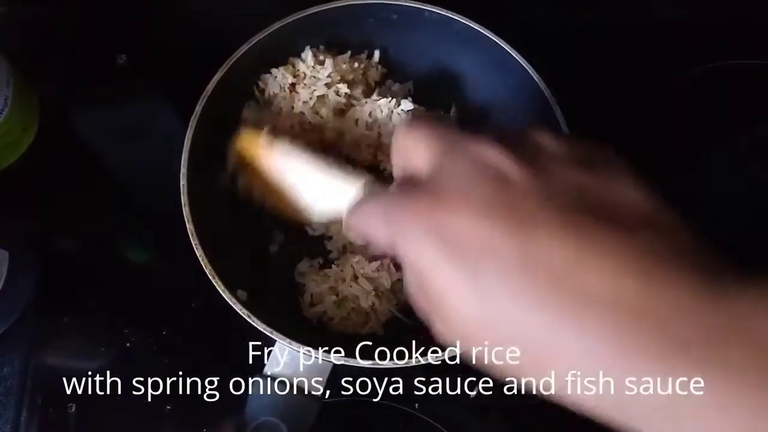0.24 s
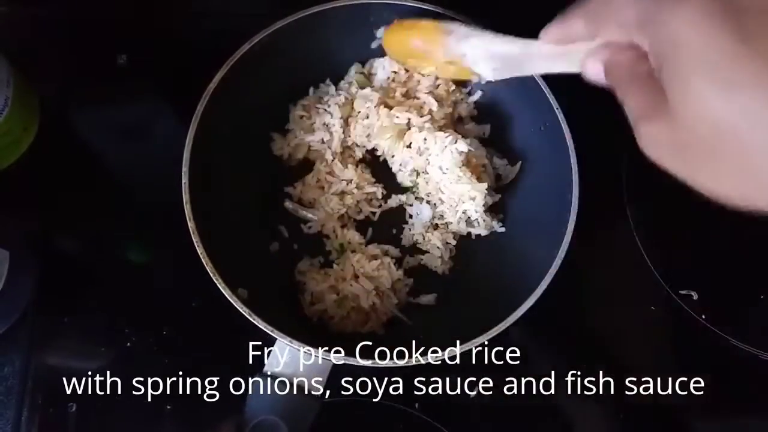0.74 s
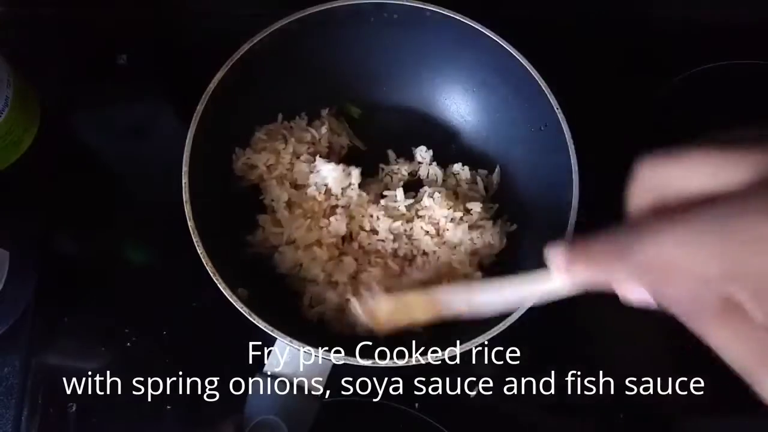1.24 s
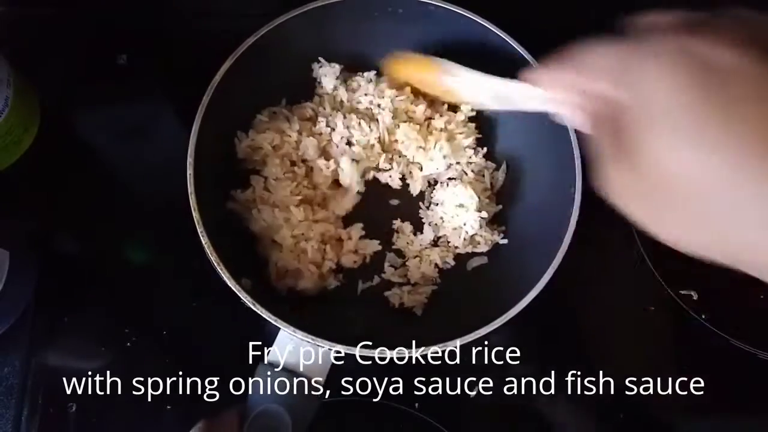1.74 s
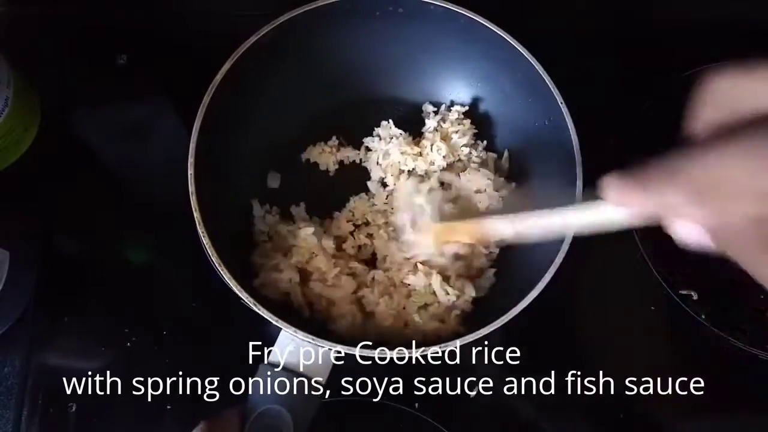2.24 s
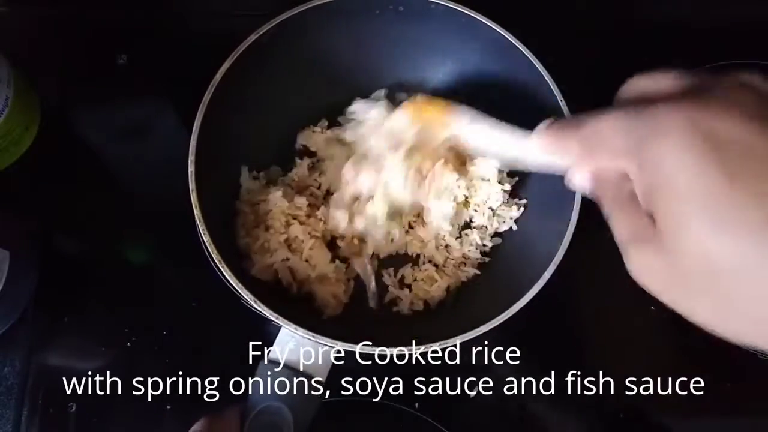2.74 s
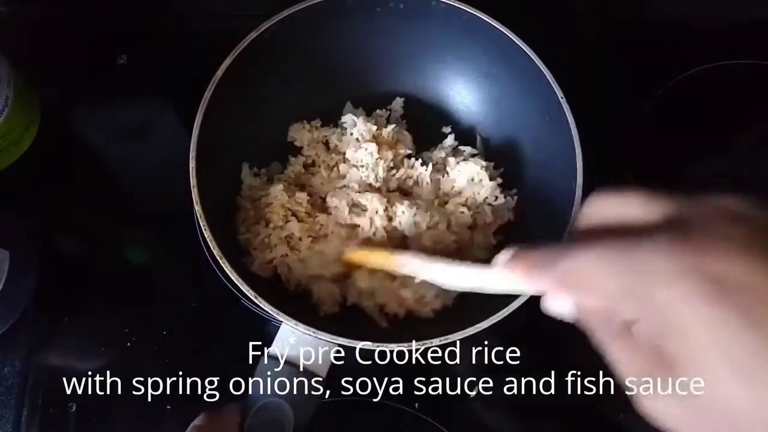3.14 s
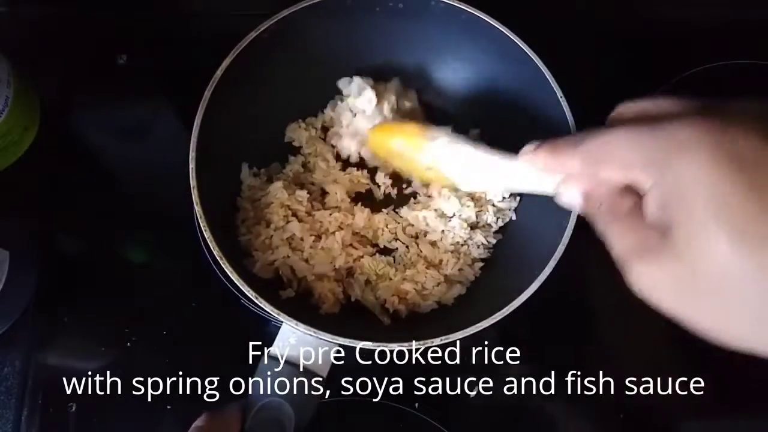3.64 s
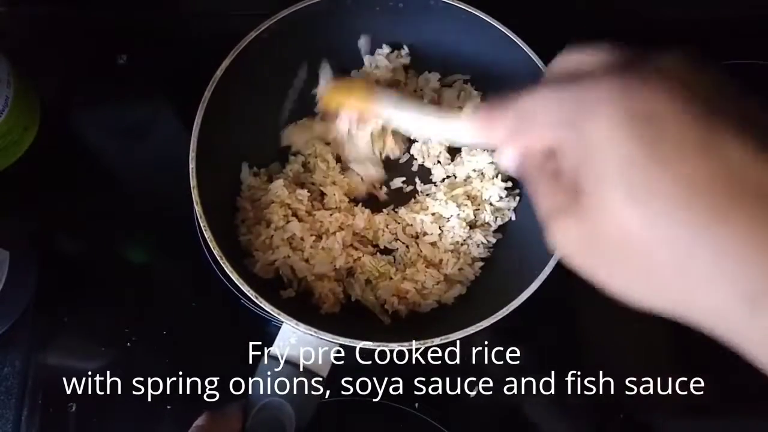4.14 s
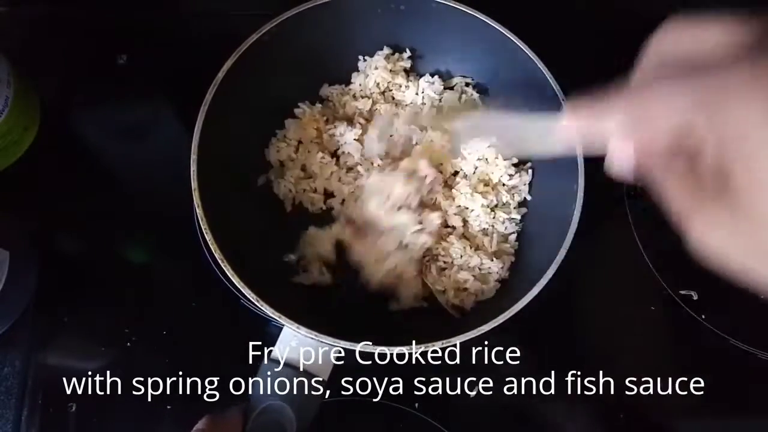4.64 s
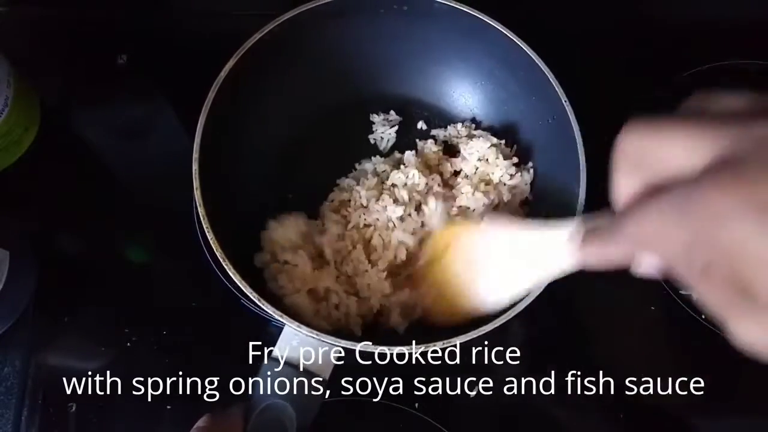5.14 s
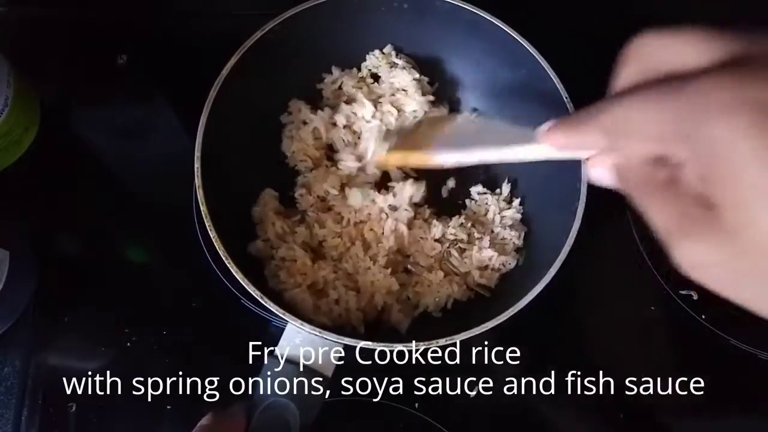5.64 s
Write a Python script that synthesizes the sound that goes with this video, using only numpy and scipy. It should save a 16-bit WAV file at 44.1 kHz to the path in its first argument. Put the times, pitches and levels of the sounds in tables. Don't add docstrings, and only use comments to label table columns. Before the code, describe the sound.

Rice fries in a thin metal pan on a kitchen hob, heard close up with a short room echo. A quiet, fine hiss with tiny crackles runs throughout, over a very faint fan hum, swelling briefly around 1.7 and 2.0 seconds. Oil spits bright little cracks, densest in the first half second, then scattered. A wooden spatula knocks the pan at 0.4 with a dull ring and a brief faint squeak. After light taps near 1.1, a hard, bright clack at 1.55 rattles on. A softer knock comes at 2.0, then a quick bouncing chatter at 2.6. Lighter taps follow at 2.9 and 3.4, a firmer one at 3.9 and a weaker one at 4.05. Knocks return at 5.0 and 5.4, then the loudest ringing clatter at 5.6 to 5.75. Strokes push low, soft thumps through the hob top; sizzling continues to the end at about six seconds.

```python
import sys
import numpy as np
from scipy import signal
from scipy.fft import rfft, irfft, next_fast_len
from scipy.io import wavfile
from scipy.ndimage import uniform_filter1d

SR = 44100
rng = np.random.default_rng(int(sys.argv[2]) if len(sys.argv) > 2 else 0)


def convert_level_to_amplitude(level_db):
    exponent = np.asarray(level_db, float) / 20
    return 10 ** exponent


def unload_audio(sound):
    columns = np.transpose(np.atleast_2d(sound))
    steps = np.round(np.clip(columns, -1, 1) * 32767)
    wavfile.write(sys.argv[1], SR, steps.astype(np.int16))


N = 260631
STEADY_TOP_HZ = 15830


def unit(x):
    return x / np.sqrt(np.mean(x ** 2) + 1e-20)


def along(points, hz):
    f, v = np.transpose(points)
    return np.interp(np.log(hz + 1), np.log(f + 1), v)


def curves(rows):
    s, *cols = np.transpose(rows)
    return [np.interp(np.arange(N) / SR, s, c) for c in cols]


def arches(rows):
    t = np.arange(0, N, 64) / SR
    rise_db = sum(db * np.sin(np.pi * np.clip((t - s) / length, 0, 1)) for s, length, db in rows)
    return np.interp(np.arange(N) / SR, t, rise_db)


def filtered(x, response):
    m = next_fast_len(len(x) + SR // 8)
    return irfft(rfft(x, m) * response(np.fft.rfftfreq(m, 1 / SR)), m)[:len(x)]


def band(x, lo_hz, hi_hz):
    sos = signal.butter(2, [lo_hz, min(hi_hz, SR / 2 - 100)], "band", fs=SR, output="sos")
    return signal.sosfilt(sos, x)


def modes(table, lag=np.pi):
    def response(f):
        total = 0
        for k, (hz, width, db) in enumerate(table):
            start = 1j * f * np.cos(k * lag) + hz * np.sin(k * lag)
            total = total + convert_level_to_amplitude(db) * width * start / (hz * hz - f * f + 1j * f * width)
        return total
    return response


def patchy(depth_db):
    z = signal.stft(rng.standard_normal(N), nperseg=512)[2]
    field = uniform_filter1d(rng.standard_normal(z.shape), 6, 0)
    field = uniform_filter1d(field, 10, 1)
    return signal.istft(z * convert_level_to_amplitude(depth_db * unit(field - field.mean())), nperseg=512)[1][:N]


def bursts(times, db, t60, tail_db, lumpy_db, bodies=None):
    out, t = np.zeros(N + SR), np.arange(SR // 4) / SR
    grain = 90
    for k, (s, level, life) in enumerate(zip(times, db, t60)):
        luck = rng.standard_normal(len(t) // grain + 1)
        lumps = 0.78 * luck + 1.33 * uniform_filter1d(luck, size=5)
        lumps = np.repeat(lumps, grain)[:len(t)]
        fade_db = -60 * t / max(life, .005)
        push = convert_level_to_amplitude(tail_db + lumpy_db * lumps + fade_db) * rng.standard_normal(len(t))
        push[0] += 1
        sound = filtered(push, bodies[k]) if bodies else push
        out[round(s * SR):][:len(t)] += convert_level_to_amplitude(level) * sound
    return out[:N]


def sizzle():
    # time in seconds, frying strength in dB
    strength = [(0.0, -78.5), (0.3, -74), (0.37, -86), (0.47, -77), (0.85, -69.5), (1.17, -72),
                (1.29, -78.5), (1.55, -75), (1.71, -62), (1.86, -76), (2.55, -78), (3.01, -73.5),
                (3.45, -75.5), (3.81, -76.5), (4.36, -81), (4.8, -73), (5.15, -73), (5.6, -79)]
    # frequency in Hz, level in dB per Hz
    hiss_colour = [(880, -15), (1500, -6.5), (1960, -17.5), (2140, -16.5), (2560, -6.5), (2770, -12),
                   (3590, -8), (5120, -6.5), (7170, -1), (8000, -6.5), (11800, -14), (15100, -13),
                   (16000, -20)]
    # start in seconds, length in seconds, rise in dB
    swells = [
        (1.964, 0.23, 7),
        (1.096, 0.089, 6),
        (4.99, 0.2, 4.5),
        (3.537, 0.32, 5),
        (4.72, 0.15, 3),
        (0.38, 0.18, 6.5),
    ]
    fry_db, = curves(strength)
    top_db = fry_db.mean() - 1.0 + 0.71 * (fry_db - fry_db.mean())
    crackle_db = 3.5 * np.minimum(rng.exponential(size=N), 2.5)
    crackle = (rng.random(N) < 1200 / SR) * rng.standard_normal(N) * convert_level_to_amplitude(crackle_db)
    hiss = patchy(2.6) + 0.57 * unit(crackle)
    clumps = rng.standard_normal(N // 100)
    flutter_db = 1.4 * np.interp(np.arange(N) / SR * 250, np.arange(N // 100), clumps)
    top = lambda hz: 1 / (1 + (9500 / (hz + 1)) ** 8)
    colour = lambda hz: convert_level_to_amplitude(along(hiss_colour, hz)) * (hz < STEADY_TOP_HZ)
    body = filtered(hiss, lambda hz: colour(hz) * np.sqrt(1 - top(hz)))
    air = filtered(hiss, lambda hz: colour(hz) * np.sqrt(top(hz)))
    mix = convert_level_to_amplitude(fry_db - 0.5) * unit(body) + convert_level_to_amplitude(top_db) * unit(air)
    return convert_level_to_amplitude(arches(swells) + flutter_db) * mix


def fan():
    # frequency in Hz, level in dB per Hz
    air_colour = [(12, -34), (20, -47), (27, -38), (48, -8.5), (102, -5), (168, -16), (247, -14.5),
                  (290, -10.5), (310, -21.5), (389, -17.5), (523, -26), (627, -14.5), (1380, -28.5),
                  (2500, -37.5), (4500, -36), (5850, -53.5), (9900, -120)]
    # start in seconds, length in seconds, rise in dB
    slides = [
        (1.45, 0.4, 8.5),
        (2.55, 0.92, 5.5),
        (3.7, 0.53, 2.5),
        (5.0, 0.93, 0.5),
    ]
    air = convert_level_to_amplitude(-68.5) * unit(filtered(patchy(2.0), lambda hz: convert_level_to_amplitude(along(air_colour, hz))))
    bass = filtered(air, lambda hz: 1 / (1 + (hz / 170) ** 6))
    whine = convert_level_to_amplitude(-80) * unit(filtered(rng.standard_normal(N), modes([(646.8, 12, 0)])))
    return bass + whine + convert_level_to_amplitude(arches(slides) - 0.4) * (air - bass)


def hob():
    # time in seconds, peak in dB, length in seconds, pitch in Hz
    pushes = [(0.195, -73, 0.069, 95.15), (0.422, -50, 0.036, 98.5), (0.795, -55, 0.1, 108.1),
              (0.936, -59.5, 0.025, 107.9), (1.037, -54.5, .035, 109.3), (1.152, -55, 0.038, 108.8),
              (1.349, -64, 0.027, 121.6), (1.45, -72, 0.029, 120), (1.566, -46, 0.033, 113.6),
              (1.636, -46, 0.046, 96.7), (2.024, -51, 0.041, 106.6), (2.162, -66, 0.047, 110.6),
              (2.32, -66, 0.032, 107.9), (2.638, -47, 0.043, 98.6), (2.7, -47.5, .03, 105),
              (3.002, -53, 0.049, 106), (3.18, -65.5, .1, 101.8), (3.408, -54, 0.098, 101.8),
              (3.506, -55.5, 0.067, 100.5), (3.723, -52.5, 0.066, 99.9), (3.906, -47.5, 0.043, 97.8),
              (4.063, -50, 0.048, 97.2), (4.775, -68, 0.018, 101), (5.013, -54, .035, 105),
              (5.117, -50, 0.032, 108.2), (5.406, -55, 0.051, 105.5), (5.685, -44, 0.07, 93.5)]
    # frequency in Hz, width in Hz, level in dB
    top_modes = [(93.6, 29, 0), (117.5, 35, -1)]
    t = np.arange(0, N, 64) / SR
    level = convert_level_to_amplitude(-71)
    for s, db, length, hz in pushes:
        level = level + convert_level_to_amplitude(db) * np.exp(-((t - s) / length * 1.58) ** 2)
    level = np.interp(np.arange(N) / SR, t, level)
    pitch_hz = curves(pushes)[-1]
    tone = np.sqrt(2) * np.sin(2 * np.pi * np.cumsum(pitch_hz) / SR)
    rough = unit(filtered(rng.standard_normal(N), lambda f: modes(top_modes)(f) ** 2))
    return convert_level_to_amplitude(-2.0) * level * (tone + 0.56 * rough)


def squeaks():
    # start in seconds, centre in Hz, width in Hz, level in dB, length in seconds
    rubs = [(1.295, 3730, 200, -77.5, 0.073), (3.4, 1500, 89, -70, 0.025), (0.396, 4620, 200, -66, .03),
            (0.399, 8500, 250, -57, 0.017), (0.398, 10800, 300, -62, 0.023), (0.402, 7100, 500, -63, 0.028),
            (0.445, 8000, 260, -66, 0.027), (0.482, 8600, 250, -64, .028), (0.13, 4800, 800, -75, 0.17),
            (0.024, 5400, 1500, -72, 0.064), (0.42, 3250, 170, -74, 0.032)]
    out = np.zeros(N)
    for s, hz, width_hz, db, length in rubs:
        span = slice(max(round(s * SR) - 2000, 0), round(s * SR) + SR // 4)
        u = (np.arange(N)[span] / SR - s) / length
        rub = unit(band(rng.standard_normal(N)[span], hz - width_hz / 2, hz + width_hz / 2))
        out[span] += convert_level_to_amplitude(db) * np.sin(np.pi * np.clip(u, 0, 1)) * rub
    return out


def spits():
    # time in seconds, peak in dB, top band relative to it in dB, t60 in seconds
    drops = [(0.0463, -58, -14, 0.14), (0.064, -59, -13, 0.05), (0.168, -71, -14, 0.037),
             (0.2433, -64, -19, 0.09), (0.279, -41, -5.5, 0.046), (0.3214, -57.5, -1, 0.028),
             (0.398, -52, -8, 0.33), (0.413, -52.5, -12, 0.33), (0.4426, -41.5, -10, 0.042),
             (0.489, -60, -10, 0.14), (0.6277, -57, -25, 0.046), (0.8247, -61, -14, 0.075),
             (0.8504, -58, -14, 0.039), (1.03, -51.5, -16, 0.084), (1.075, -55.5, -5, 0.052),
             (1.1275, -60, -6, 0.069), (1.1466, -64, -13, 0.049), (1.3147, -59, -11, 0.068),
             (1.6413, -46.5, -4, 0.12), (1.827, -57, -18, 0.088), (2.005, -55.5, -18, 0.2),
             (2.033, -54, -28, 0.072), (2.0583, -50.5, -17, 0.074), (2.144, -52, 1, 0.034),
             (2.257, -55, -15, 0.093), (2.279, -50.5, -15, 0.12), (2.842, -48, -9, 0.044),
             (3.371, -57.5, -10, 0.16), (3.7218, -56, -13, 0.17), (3.8352, -60, 3, 0.025),
             (4.042, -49, -1, 0.053), (4.4355, -60, -20, 0.13), (5.1322, -54, -14, 0.061),
             (5.242, -43, -5, 0.034), (5.8577, -44.5, -6, 0.058)]
    # time in seconds, peak in dB
    faint_ticks = [(0.6664, -62), (0.9707, -55.5), (1.2465, -62), (1.3513, -61), (2.9078, -57),
                   (3.253, -59), (3.6324, -64), (3.8818, -53), (4.3571, -60), (4.5043, -64), (4.571, -64),
                   (4.77, -59), (4.87, -71), (5.395, -48.5), (5.68, -54), (5.745, -47)]
    s, db, top, t60 = np.transpose(drops + [row + (-5, 0.044) for row in faint_ticks])
    scatter_hz = 350 * rng.standard_normal(len(s))
    ring_hz = 7140 - 52 * (db - db.mean()) + scatter_hz
    fizz = np.zeros(N)
    for lo, hi, gain_db in [(2000, 11000, -17), (5230, 10300, -2.5), (9050, 17500, top - 2.4)]:
        fizz += band(bursts(s, db + gain_db, t60, -0.79, 2.4), lo, hi)
    rings = [modes([(hz, 300, 0)]) for hz in ring_hz]
    return fizz + bursts(s, db + 7.0, t60, -4.5, 1.7, rings)


def struck(body, tilts_db, soft_hz, scatter_db, lag):
    middle = np.median([hz for hz, width, db in body])

    def contact(tilt):
        moved = []
        for hz, width, db in body:
            shift = 0.012 * rng.normal() * hz / (hz + 2000)
            level = db + tilt * np.log2(hz / middle) + rng.normal(0, scatter_db)
            moved.append((hz * (1 + shift), width, level))
        ring = modes(moved, lag)
        return lambda f: ring(f) / (1 + 1j * f / soft_hz) ** 3
    return [contact(tilt) for tilt in tilts_db]


def pan():
    # time in seconds, base peak in dB, base tilt in dB/oct,
    # wall relative to base in dB, wall tilt in dB/oct
    knocks = [(0.389, -30.5, 1, -16, -26), (1.126, -51, -16, -17, -3), (1.5425, -24.5, -5.5, 3, 14),
              (1.988, -37.5, 1.5, 3.5, 4), (2.589, -29, 4, 9, 12), (2.925, -51, 14, 8, 3),
              (3.371, -41, -6, -16, 18), (3.715, -60, -14, -7, -1), (3.871, -30, -4, 3.5, 3),
              (4.044, -41, -5, -8.5, 7), (4.987, -36.5, 2, 7, -5.5), (5.076, -42, -15, -6, -7),
              (5.242, -65, 2, 6, 19), (5.38, -35, 0, 12, 1), (5.6245, -29, 4, 3, -6),
              (5.724, -30, -2, -14, -3)]
    # time in seconds, base peak in dB, base tilt in dB/oct, wall rel. in dB
    rebounds = [(0.4, -45, 5, -1.5), (1.143, -48, -7, -10), (1.551, -31.5, 8.5, -7), (1.59, -34.5, -10, 3),
                (1.623, -39, 1, -14), (1.66, -40.5, -16, -33), (2.092, -54, -10, -14),
                (2.595, -35, -5, 10.5), (2.601, -34.5, 9, 8.5), (2.609, -35, 4, 9), (2.616, -26.5, -6.5, 2),
                (2.632, -31, 3, 0), (2.974, -47, -8, -14), (5.094, -45.5, 10, 2.5), (5.12, -54, 4, 2),
                (5.63, -31, 3, -2), (5.639, -26.5, -3, -1), (5.646, -30.5, -3, 6), (5.667, -35, 8, 7),
                (5.692, -36, -5, 4), (5.42, -45, 9, 1), (5.445, -51, 11, 2), (5.734, -35, 6, -5)]
    # time in seconds, flank peak in dB, flank tilt in dB/oct,
    # rim relative to flank in dB, rim tilt in dB/oct
    clacks = [(0.3904, -68, -9, -2, -2), (1.5425, -23, 2, -4, 6), (1.5519, -28, -6.5, -8, 5),
              (1.574, -38, 1, -0.5, 12), (1.6, -34.5, -6, -4, 7), (1.989, -41.5, -5, -21.5, 1.5),
              (2.5898, -26, -2, -2.5, -15), (2.6, -31, -6, -6, 1), (2.6162, -31.5, 1, -4.5, 5),
              (2.6085, -38, 7, -5, 3), (2.622, -40, 0, -6, 0), (2.632, -38, 0, -4.5, 5),
              (2.641, -46, 0, -5, 0), (2.928, -56, -10, 1.5, 8), (3.8707, -55, -1, 1.5, 12),
              (4.0418, -58, 0, 5, -5), (4.9858, -35, 15, -9.5, 6), (5.083, -60.5, -8, 2, 1),
              (5.3811, -31.5, -7, -11, 14), (5.3948, -59, 15, 5.5, 23), (5.6241, -19.5, -3, -2.5, -2),
              (5.631, -29, -3, -5.5, -6), (5.6406, -27, 4, -11, -2), (5.6634, -41, 11, -1.5, -1.5),
              (5.7333, -39, 0.5, -3, -9)]
    # frequency in Hz, width in Hz, level in dB
    base_modes = [(159.3, 12, -1.5), (196.5, 8, -21), (258, 21.3, 7.5), (331, 76, -6.5), (399, 32, -1),
                  (443, 37, -3)]
    wall_modes = [(636, 33, -4.5), (720, 62, 3), (790, 29, 0), (850, 47, -3), (962, 72, -4),
                  (1117, 38.7, -7), (1262, 36, -12.5)]
    flank_modes = [(1500, 73, 0.5), (1960, 91, -2.5), (2236, 33, -2), (2760, 173, -1.5), (3167, 78, -5),
                   (3642, 47, -8), (2450, 890, -11.5)]
    rim_modes = [(4145, 90, -15.5), (4600, 100, -16), (5230, 120, -7.5), (5820, 48, -12), (5980, 49, -15),
                 (6390, 98, -6), (6820, 140, -5), (7600, 57, -4), (7700, 70, -3.5), (8170, 91, 2.5),
                 (8530, 80, 2.5), (9070, 59, 0), (7190, 3240, -4.5)]
    bounced = [row + (1.1,) for row in rebounds]
    s, db, base_tilt, wall, wall_tilt = np.transpose(knocks + bounced)
    t60 = [0.09] * len(knocks) + [0.1] * len(rebounds)
    base = struck(base_modes, base_tilt, soft_hz=658, scatter_db=1.0, lag=1.44)
    low = bursts(s, db + 39, t60, -31.0, 2.1, base)
    side = struck(wall_modes, wall_tilt, soft_hz=1620, scatter_db=1.5, lag=1.48)
    low += bursts(s, db + wall + 35.0, t60, -28.0, 1.9, side)
    s, db, flank_tilt, rim, rim_tilt = np.transpose(clacks)
    t60 = 0.19 + 0.0233 * rim
    flank = struck(flank_modes, flank_tilt, soft_hz=5500, scatter_db=1.5, lag=np.pi)
    high = bursts(s, db + 27.5, t60, -25.5, 3.6, flank)
    edge = struck(rim_modes, rim_tilt, soft_hz=8200, scatter_db=2.0, lag=np.pi)
    high += bursts(s, db + rim + 19.0, t60, -14, 3.3, edge)
    echo = lambda f: 1 - 0.37 * modes([(520, 150, 0)])(f)
    small = lambda f: (1j * f / (120 + 1j * f)) ** 2
    return filtered(low + high, lambda f: echo(f) * small(f))


def notes():
    # time in seconds, pitch in Hz, peak in dB, t60 in
    # seconds
    bare_notes = [(.389, 342, -32.5, 0.075), (1.543, 2760, -43, 0.042), (1.598, 2000, -34.5, 0.048),
                  (1.65, 198, -43, 0.21), (2.925, 366, -38, 0.047), (3.872, 1257, -29, 0.024),
                  (3.872, 402, -35, 0.1), (4.987, 3470, -44.5, 0.028), (4.987, 290.5, -28.5, 0.072),
                  (5.243, 1290, -59, 0.032), (5.381, 2000, -38.5, 0.054), (5.381, 2737, -45, 0.064),
                  (5.382, 5230, -50, 0.078), (5.381, 1557, -34.5, 0.039), (5.395, 7600, -51, 0.078),
                  (5.627, 720, -16.5, 0.08), (1.128, 258, -50, 0.1), (4.987, 1350, -41, 0.032),
                  (4.987, 2694, -52, 0.04), (5.243, 5500, -45, 0.015), (5.3824, 425, -25.5, 0.075),
                  (5.636, 258, -27.5, 0.12), (5.7335, 258, -23.5, 0.11), (5.7451, 258, -30, .09),
                  (5.641, 740, -22, .07), (5.66, 720, -33, .2), (1.5436, 252, -33.5, .1),
                  (2.592, 1012, -39, .15), (2.6, 1124, -42, .2), (1.544, 790, -38, 0.073),
                  (2.588, 1500, -36, 0.18), (2.842, 5456, -55, 0.025), (1.989, 258, -42.5, 0.14),
                  (5.648, 6390, -37, 0.097), (5.6245, 5230, -22, 0.035), (5.639, 5230, -32, 0.056),
                  (5.6245, 5820, -24.5, 0.04), (5.638, 2221, -35.5, 0.12), (1.5425, 8200, -33.5, 0.06),
                  (1.5425, 6710, -33, 0.046), (1.575, 1500, -39.5, 0.087), (2.614, 7800, -38, 0.04),
                  (2.634, 4600, -43, 0.04),
                  (1.112, 258, -56.5, .2), (1.14, 807, -61, .08), (2.927, 3526, -61.5, .06),
                 (2.94, 2223, -65, .15), (2.925, 790, -36.5, 0.043), (3.372, 258, -37, 0.097),
                 (3.873, 258, -41, 0.11), (3.873, 680, -37, .05), (3.7, 393, -53, .07),
                 (4.046, 703, -50, .04), (5.074, 230, -50, .06), (5.078, 377, -52, 0.22),
                 (5.083, 711, -47.5, 0.14), (5.01, 790, -48, 0.14), (5.382, 280, -28, 0.084),
                 (5.381, 2420, -44, 0.042), (2.59, 732, -32, .08), (2.598, 861, -35, .1),
                 (2.61, 258, -34, 0.077), (5.6285, 640, -27, .05), (5.73, 398, -35.5, 0.079),
                 (5.694, 6390, -46, .09), (5.672, 5230, -48, .06), (5.733, 5500, -44, .05),
                 (5.776, 6390, -54, 0.044), (1.5425, 2770, -36, 0.046), (1.5425, 1020, -37, 0.066),
                 (1.59, 790, -42, .08), (1.73, 8300, -56, .06), (.44, 2800, -64, .07),
                 (.44, 1310, -60, .04), (.39, 810, -48, 0.16), (1.989, 800, -46.5, 0.045),
                 (1.3, 290, -64, .2), (3.2, 255, -55, .15)]
    out, t = np.zeros(N + SR), np.arange(SR // 3) / SR
    for s, hz, db, t60 in bare_notes:
        blur = np.sqrt(2 * np.pi * 0.013 * hz / SR) * hz / (hz + 3000)
        drift = np.cumsum(rng.standard_normal(len(t))) * blur
        tone = np.sin(2 * np.pi * hz * t + drift) * (1 - np.exp(-t / 0.002))
        out[round(s * SR):][:len(t)] += convert_level_to_amplitude(db - 60 * t / t60) * tone
    return out[:N]


def kitchen(x):
    # frequency in Hz, t60 in seconds
    room_decay = [(100, 0.15), (700, 0.26), (4000, 0.34), (12000, 0.26)]
    out, hop = np.zeros(N + 2 * SR), SR // 4
    for start in range(0, N, hop):
        hz, t, z = signal.stft(rng.standard_normal(SR // 2), SR, nperseg=256)
        fade = convert_level_to_amplitude(-60 * t / along(room_decay, hz)[:, None])
        tail = signal.istft(z * fade, SR, nperseg=256)[1]
        wet = signal.fftconvolve(x[start:start + hop], tail / np.linalg.norm(tail))
        out[start + 200:][:len(wet)] += wet
    return out[:N]


def scene():
    wood, oil, bare = pan() + squeaks(), spits(), notes()
    dull_notes = filtered(bare, lambda hz: 0.67 / (1 + hz / 2500))
    room = convert_level_to_amplitude(-7.5) * kitchen(wood + oil + dull_notes)
    lasting = filtered(wood + bare + 0.64 * oil + room, lambda hz: hz < STEADY_TOP_HZ)
    return (lasting + 0.53 * oil + sizzle() + hob() + fan())[None]


def gappy_treble(x):
    # frequency in Hz, rarity in spreads
    gap_rarity = [(1500, 4), (2000, 1.7), (3100, 1.1), (4300, 1.3), (5200, 2.6), (12000, 3.2), (14500, 2.2)]
    hz, t, z = signal.stft(x, SR, nperseg=2048, noverlap=1536)
    level = uniform_filter1d(np.abs(z) ** 2, size=9, axis=0)
    luck = uniform_filter1d(rng.standard_normal((len(hz) // 9 + 1, len(t))), size=7, axis=1)
    empty = np.repeat(unit(luck), 9, axis=0)[:len(hz)] > along(gap_rarity, hz)[:, None]
    quiet = level < 5 * np.median(level, axis=1)[:, None]
    total = level.sum(axis=0)
    loud = (total > convert_level_to_amplitude(44) * np.median(total)) & (hz[:, None] > 14300)
    gain = np.where(empty & quiet | loud, .02, 1)
    return signal.istft(z * gain, SR, nperseg=2048, noverlap=1536)[1][:N]


def top_cut(x):
    return signal.sosfilt(signal.butter(12, 16430, fs=SR, output="sos"), x)


def record(dry):
    mix = filtered(gappy_treble(dry[0]), lambda hz: np.clip((16430 - hz) / 300, 0, 1))
    return top_cut(mix[None])


dry = scene()
out = record(dry)
unload_audio(out)
```